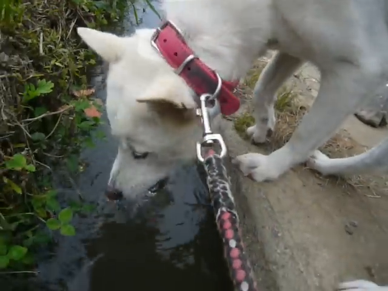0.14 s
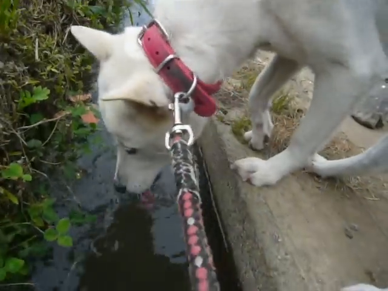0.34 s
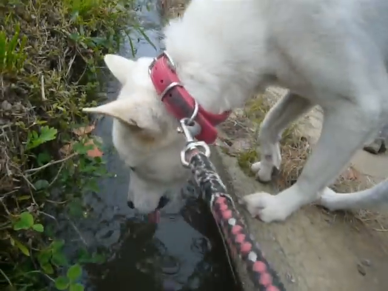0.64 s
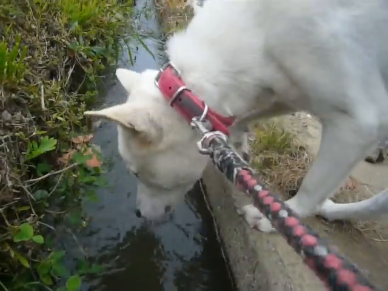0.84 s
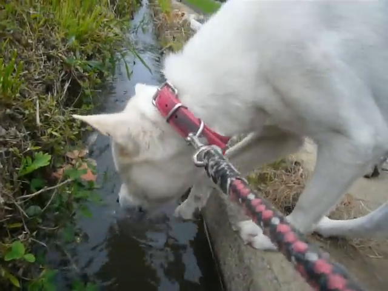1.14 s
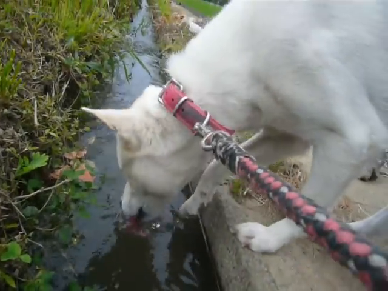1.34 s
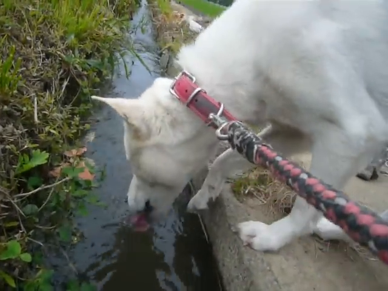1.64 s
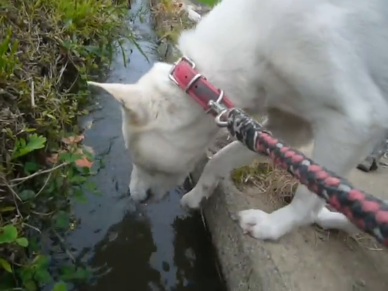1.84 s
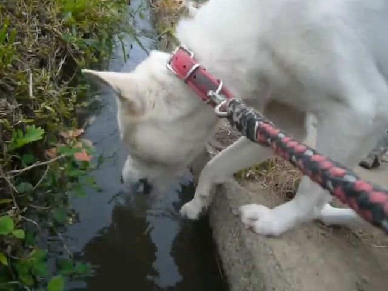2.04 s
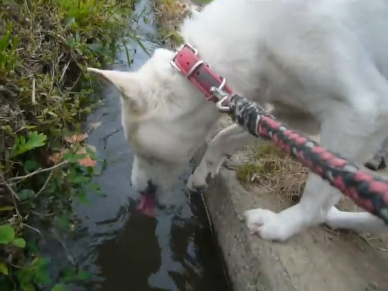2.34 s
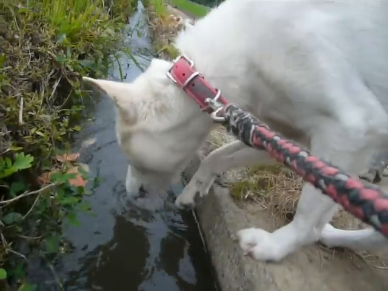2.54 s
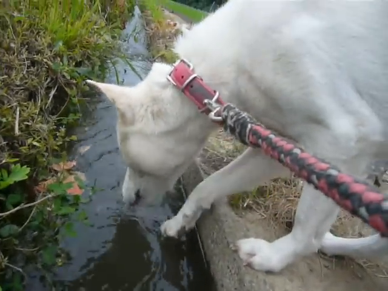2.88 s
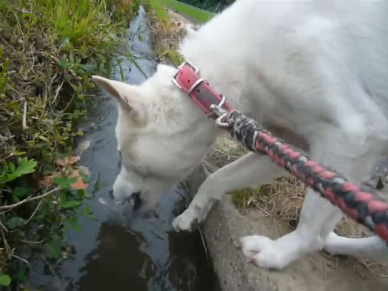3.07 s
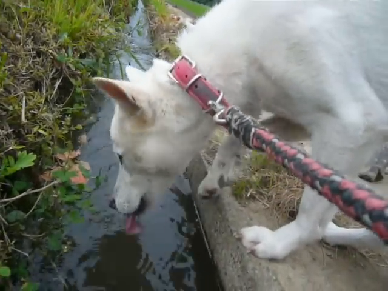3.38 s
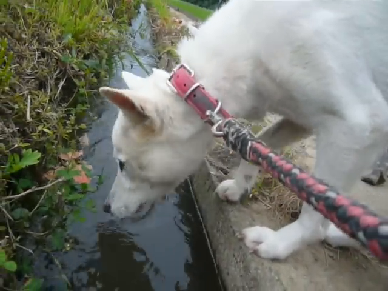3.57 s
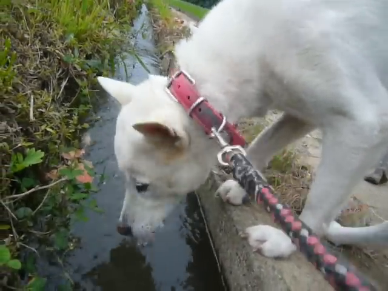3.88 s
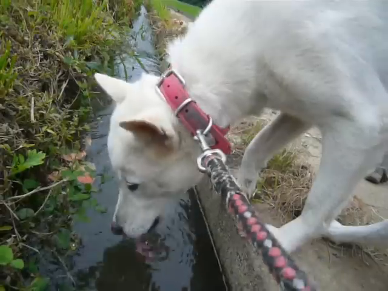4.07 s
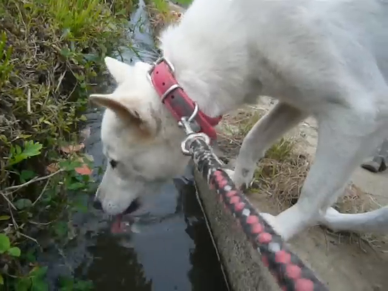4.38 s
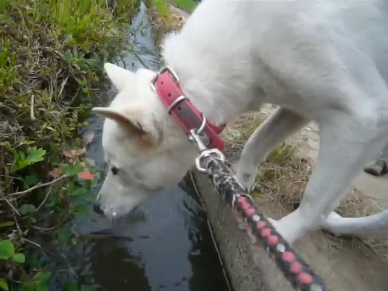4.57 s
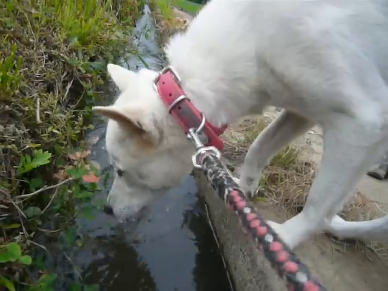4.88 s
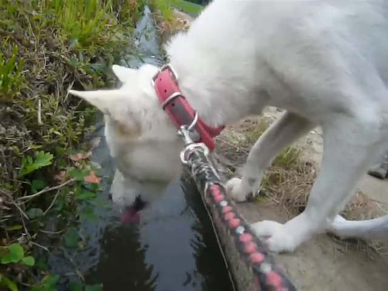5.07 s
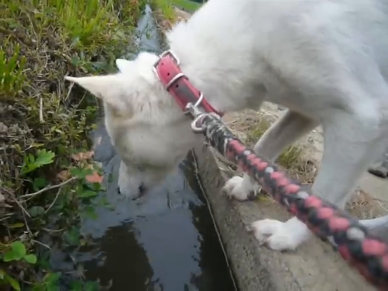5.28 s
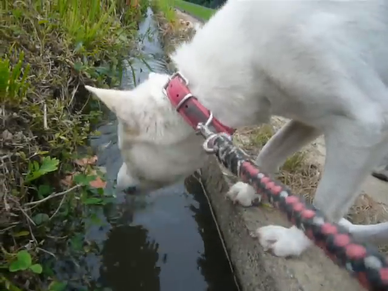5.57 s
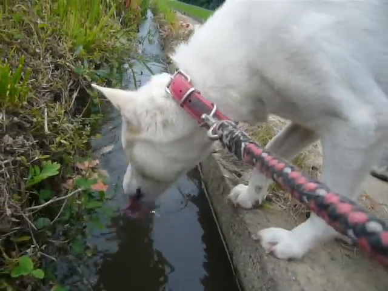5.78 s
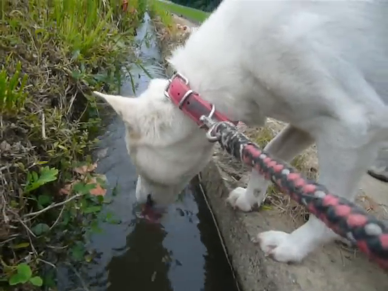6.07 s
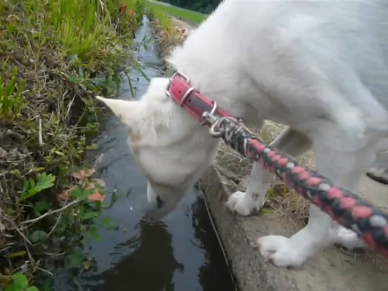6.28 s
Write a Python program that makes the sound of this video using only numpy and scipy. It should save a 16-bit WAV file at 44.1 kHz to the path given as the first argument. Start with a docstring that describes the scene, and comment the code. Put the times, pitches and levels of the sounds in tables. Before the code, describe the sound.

A dog laps water fast from a narrow ditch, each stroke a wet slosh with clicks, plips and small gulps.

```python
"""A dog's tongue laps quickly from a narrow concrete ditch, about three strokes a second. Each stroke sloshes
the surface, then water falls back in spray and drops: swarms and single ringing air pockets. Now and then the
tongue smacks, a click and a ring, or gulps a big pocket that sheds smaller ones. The ditch runs underneath as
coloured noise and sparse bubbles, and a thin tone slides down once. A hand-held camera adds hum, whine, hiss,
knocks and grip rumble; its digital filter ends the sound near 4 kHz."""
import sys
import numpy as np
from scipy import signal
from scipy.fft import rfft, irfft, next_fast_len
from scipy.io import wavfile
from scipy.ndimage import uniform_filter1d

SR = 44100
rng = np.random.default_rng(int(sys.argv[2]) if len(sys.argv) > 2 else 0)


def inscribe(sig):
    """Save sig as 16-bit PCM at rate SR to the path in sys.argv[1].

    A 1-D sig is mono; a 2-D sig holds one channel per row.
    Samples are clipped to [-1, 1] before scaling.
    """
    pcm = np.round(np.clip(np.atleast_2d(sig).T, -1, 1) * 32767)
    wavfile.write(sys.argv[1], SR, pcm.astype(np.int16))


N = 283122


def from_db(db):
    """Decibels to gain."""
    return 10 ** (np.asarray(db) / 20)


def rms_one(x):
    """Scale to rms 1."""
    return x / np.sqrt(np.mean(x ** 2) + 1e-20)


def at_hz(points, hz):
    """Read a spectrum in dB on a log-frequency axis."""
    point_hz, point_db = np.transpose(points)
    return np.interp(np.log(hz + 1e-9), np.log(point_hz), point_db)


def coloured(gain_at):
    """Noise of rms 1 whose gain follows a function of frequency."""
    size = next_fast_len(N)
    spectrum = rfft(rng.standard_normal(size))
    gain = gain_at(np.fft.rfftfreq(size, 1 / SR))
    return rms_one(irfft(spectrum * gain, size)[:N])


def add(out, s, sound):
    """Mix a short sound in at time s."""
    start = int(np.clip(round(s * SR), 0, N - 1))
    out[start:start + len(sound)] += sound[:N - start]


def swells(rows):
    """Gain that builds up to each (s, dB, rise s, fall s) and dies away after it, adding overlaps as power."""
    t = np.arange(0, N, 32) / SR
    power = np.zeros(len(t))
    for s, db, rise, fall in rows:
        distance = np.maximum((s - t) / rise, (t - s) / fall)
        power += from_db(db) ** 2 * np.exp(-2 * distance)
    return np.interp(np.arange(N) / SR, t, np.sqrt(power))


def bubble(hz, t60, rise, swell_cycles, collapse=1.47):
    """An air pocket swells and rings, its pitch climbing; a collapse above 1 makes it die ever faster."""
    t = np.arange(int(t60 * SR) + 8) / SR
    swell = 1 - np.exp(-t * hz / swell_cycles)
    envelope = swell * np.exp(-np.log(1000) * (t / t60) ** collapse)
    pitch = hz * (1 + rise * (t / t60 - 1 / 5))
    return envelope / envelope.max() * np.sin(2 * np.pi * np.cumsum(pitch) / SR)


def pocket(hz, t60, rise=0.043, collapse=1.48, swell_cycles=0.77):
    """A pocket rings, and the water closing over it makes a tiny splash; low pockets splash longer."""
    splash_db, splash_swell_s = -14, 0.0038
    splash_t60 = 0.031 * np.sqrt(1000 / hz)
    t = np.arange(SR // 5) / SR
    edges_hz = [min(hz * 1.1, SR / 16), min(hz * 3, SR / 8)]
    band = signal.butter(1, edges_hz, "band", fs=SR, output="sos")
    splash = rms_one(signal.sosfilt(band, rng.standard_normal(len(t))))
    envelope = (1 - np.exp(-t / splash_swell_s)) * np.exp(-np.log(1000) * t / splash_t60)
    out = from_db(splash_db) * splash * envelope
    ring = bubble(hz, t60, rise, swell_cycles, collapse)[:len(t)]
    out[:len(ring)] += ring
    return out


def spatter(hz, length, count=9):
    """Tiny pockets of scattered pitch burst in quick succession; rms 1 over the length in s."""
    octaves, ring_cycles, spread_db = 0.47, 10.3, 4   # octaves and dB reach either way
    out = np.zeros(SR // 10)
    for k, (slip, pitch, strength) in enumerate(rng.random((count, 3))):
        own_hz = hz * 2 ** (octaves * (2 * pitch - 1))
        ring = bubble(own_hz, ring_cycles / own_hz, rise=0.13, swell_cycles=1.0)
        start = int((k + slip) / count * length * SR)
        gain = from_db(spread_db * (2 * strength - 1))
        out[start:start + len(ring)] += gain * ring[:len(out) - start]
    return out * np.sqrt(length * SR / np.sum(out ** 2))


def swarm(colour, per_s, cycles, spread_db, rise, even_s, count=48):
    """Small bubbles of random size and pitch, their slow level swings evened out; rms 1."""
    pitches = np.geomspace(colour[0][0], colour[-1][0], count)
    dampings = rng.uniform(-.9, 1, count)   # octaves of ring length
    rings = []
    for hz, damping in zip(pitches, dampings):
        ring = bubble(hz, cycles * 2 ** damping / hz, rise, swell_cycles=0.16)
        rings.append(from_db(at_hz(colour, hz)) * np.sqrt(hz) * ring)
    when, which, rarity = rng.random((int(per_s * N / SR), 3)).T
    # most are small, a few stand out
    strengths = from_db(-spread_db * np.log(np.maximum(rarity, .03)))
    out = np.zeros(N + SR)
    for start, k, strength in zip((when * N).astype(int), (which * count).astype(int), strengths):
        out[start:start + len(rings[k])] += strength * rings[k]
    out = rms_one(out[:N])
    size = max(int(even_s * SR), 2)
    power = uniform_filter1d(uniform_filter1d(out ** 2, size), size)
    return rms_one(out / np.sqrt(np.abs(power) + 0.035))


def stirred_water():
    """Every stroke sloshes the surface and throws fine spray; the water falling back does so again."""
    # strokes of the tongue: start_s, slosh_db, spray_db, build_and_settle_s,
    # wait_s until the water falls back, back_slosh_db, back_spray_db
    laps = [(0.0, -27, -37, 0.016, 0.16, -51, -42), (0.335, -37.5, -48, 0.18, 0.13, -40, -38),
            (0.53, -34, -42.5, 0.047, 0.14, -34.5, -39), (0.869, -44, -47, 0.067, 0.13, -31.5, -46),
            (1.24, -37, -58, 0.058, 0.069, -34, -48), (1.541, -25.5, -36, 0.012, 0.096, -37, -42),
            (1.833, -29, -42, 0.039, 0.096, -39, -46), (2.116, -34.5, -43.5, 0.058, 0.19, -35, -48),
            (2.53, -33.5, -47, 0.043, 0.12, -35, -40.5), (2.86, -39, -45, 0.15, 0.13, -35, -39),
            (3.18, -31, -44, 0.035, 0.28, -50, -47), (3.595, -32.5, -46, 0.051, 0.1, -36.5, -40),
            (3.90, -33.5, -45, 0.023, 0.17, -36, -44), (4.301, -33.5, -44, 0.033, 0.098, -36, -35.5),
            (4.62, -32, -39.5, 0.025, 0.089, -32, -39), (4.909, -34.5, -51, 0.027, 0.14, -59, -46),
            (5.241, -33, -45, 0.05, 0.2, -36, -38), (5.745, -33.5, -58, 0.05, .04, -55, -62),
            (5.945, -36.5, -40, 0.044, 0.1, -34, -43), (6.269, -32.5, -40, 0.039, 0.1, -29, -34)]
    # colours of the two bubble swarms: pitch_hz, level_db
    slosh_colour = [(300, -3), (430, -3), (600, 2.5), (760, -4), (1050, 5), (1400, -6.5)]
    spray_colour = [(1450, 9.5), (1700, 4), (2100, -0.5), (2700, 3.5), (3300, -1), (3900, -1.5)]
    back_rise_s, back_fall_s = 0.019, 0.022
    ripple_slosh_db, ripple_spray_db = -45, -50.5   # the surface between strokes
    s, slosh_db, spray_db, length, wait, back_slosh_db, back_spray_db = np.transpose(laps)

    def level(stroke_db, back_db, ripple_db):
        """Stroke, fall-back and resting ripple add as power."""
        stroke = swells(zip(s, stroke_db, length, length))
        back = swells((when, db, back_rise_s, back_fall_s) for when, db in zip(s + wait, back_db))
        return np.sqrt(stroke ** 2 + back ** 2 + from_db(ripple_db) ** 2)

    slosh = swarm(slosh_colour, per_s=600, cycles=18.0, spread_db=2.5, rise=0.17, even_s=0.081)
    spray = swarm(spray_colour, per_s=950, cycles=30, spread_db=4.0, rise=0.097, even_s=0.069)
    sloshing = level(slosh_db, back_slosh_db, ripple_slosh_db) * slosh
    spraying = level(spray_db, back_spray_db, ripple_spray_db) * spray
    return sloshing + spraying


def gulping():
    """The tongue traps a big air pocket that rings, closes with a splat and sheds smaller pockets."""
    # big pockets: start_s, pitch_hz, level_db, small_pockets_db against the big one, t60_s
    gulps = [(0.87, 350, -13, -11.5, 0.042), (1.8562, 349, -25, -11, .044), (2.1451, 356, -13, -6, 0.037),
             (3.2592, 321, -29.5, -18, .055), (3.9335, 303, -28, -8.5, 0.061),
             (5.242, 345, -14.5, -10, 0.042)]
    # a short low push and two ringing tones: pitch_ratio, level_db, share of the big pocket's t60
    gulp_rings = [(0.74, -19.5, 0.41), (1.02, 1, 0.91), (1.56, -5, 0.38)]
    # the small pockets it sheds: delay_s, pitch_hz, level_db, t60_s
    sheds = [(.001, 780, 2, 0.0033), (.006, 1080, -1, 0.0093), (.0065, 2000, -21, .003),
             (0.0097, 1516, -2.5, 0.023)]
    splat_delay_s, splat_hz, splat_db, splat_length_s = 0.00319, 758, -7.5, .013
    scatter_share, scatter_s = 0.053, 0.00079   # no two gulps shed alike in pitch and timing
    out = np.zeros(N)
    for s, hz, big_db, small_pockets_db, big_t60 in gulps:
        for ratio, ring_db, share in gulp_rings:
            # climbs further in pitch and is cut short as it bursts
            ring = pocket(hz * ratio, big_t60 * share, rise=0.067, collapse=1.74, swell_cycles=1)
            add(out, s, from_db(big_db + ring_db) * ring)
        shed_db = big_db + small_pockets_db
        add(out, s + splat_delay_s, from_db(shed_db + splat_db) * spatter(splat_hz, splat_length_s))
        for delay, small_hz, small_db, t60 in sheds:
            late, sharp = rng.uniform(-1.02, 1, 2)
            small = pocket(small_hz * (1 + scatter_share * sharp), t60)
            add(out, s + delay + scatter_s * late, from_db(shed_db + small_db) * small)
    return out


def smacking():
    """The wet tongue smacks: a short click, answered at once by a ringing pocket."""
    # start_s, click_hz, click_db, ring_hz, ring_db, ring t60_s, collapse (1 fades freely, 4 is cut off)
    smacks = [(0.071, 1690, -21.5, 1110, -23, 0.028, 1), (0.3174, 1750, -18.5, 1140, -27, 0.04, 1.4),
              (0.495, 488, -9, 1072, -8.5, 0.018, 1.8), (1.538, 890, -27, 2060, -20, 0.015, 1),
              (2.3495, 1880, -20.5, 3680, -10.5, 0.0028, 1.2), (3.9075, 2380, -16, 1690, -18, 0.016, 1.5),
              (4.406, 570, -19.5, 1150, -20.5, 0.032, 1.1), (4.622, 710, -16.5, 2200, -21, .005, 1),
              (4.699, 1850, -10, 2594, -10, 0.0067, 3.5), (5.3188, 2830, -11, 1665, -15, 0.015, 1.2),
              (5.7459, 2480, -18.5, 840, -15.5, 0.017, 0.93),
              (5.971, 770, -15.5, 1830, -17.5, 0.0078, 0.87), (6.047, 2540, -24, 1710, -23, 0.006, 1.15),
              (6.3688, 2240, -31, 1540, -11, 0.0058, 4.6)]
    ring_lag_s = 0.00059
    out = np.zeros(N)
    for s, click_hz, click_db, ring_hz, ring_db, t60, collapse in smacks:
        click_t60 = 0.0031 * np.sqrt(2000 / click_hz)   # low clicks last longer
        add(out, s, from_db(click_db) * bubble(click_hz, click_t60, rise=0.11, swell_cycles=1.0))
        add(out, s + ring_lag_s, from_db(ring_db) * pocket(ring_hz, t60, collapse=collapse))
    return out


def drops():
    """Drops from the muzzle trap one small pocket each; water from tongue and lips spatters in bursts."""
    # single drops: start_s, pitch_hz, level_db, t60_s
    plips = [(0.212, 1080, -23.5, 0.042), (0.3248, 845, -20, 0.005), (0.438, 3050, -27, .008),
             (0.512, 910, -19.5, 0.021), (0.5308, 3400, -27, 0.013), (0.541, 1080, -36, 0.015),
             (0.578, 3650, -24, 0.0042), (0.8497, 1100, -24, 0.007), (1.061, 3280, -36.5, .015),
             (1.131, 2650, -22.5, 0.0095), (1.1415, 2900, -21.5, 0.0028), (1.2864, 597, -22.5, 0.02),
             (1.302, 554, -27, 0.021), (1.3225, 3070, -28, .008), (1.3687, 1710, -28, 0.02),
             (1.3911, 1110, -26.5, .01), (1.392, 2580, -30, .007), (1.3924, 1630, -22.5, 0.01),
             (1.411, 2580, -22, 0.0069), (1.5405, 1030, -18, 0.005), (1.6116, 610, -23.5, 0.021),
             (1.622, 2420, -34, .007), (1.633, 1680, -30, 0.007), (1.639, 1140, -23.5, 0.017),
             (1.8625, 634, -24, 0.0099), (1.9503, 3050, -33, 0.016), (2.0335, 3360, -35, .011),
             (2.085, 510, -28, 0.043), (2.1282, 1040, -23, 0.011), (2.248, 3220, -32, 0.026),
             (2.287, 3300, -33, 0.0064), (2.351, 2930, -22, 0.007), (2.3526, 2350, -24, 0.013),
             (2.353, 1170, -24, 0.01), (2.5, 1550, -24, 0.0078), (2.5915, 3400, -36, .011),
             (2.631, 1650, -27, 0.0083), (2.709, 694, -28, 0.024), (2.8127, 448, -28.5, 0.054),
             (2.8442, 1065, -28, 0.043), (2.8677, 1150, -18, 0.0072), (2.9481, 464, -26, 0.012),
             (2.959, 2450, -28.5, 0.016), (2.988, 1600, -26.5, .011), (3.035, 1650, -20.5, 0.0084),
             (3.0516, 2480, -32, 0.029), (3.063, 1610, -21.5, 0.023), (3.1385, 3140, -35, 0.0099),
             (3.151, 1630, -27.5, 0.019), (3.165, 926, -19.5, 0.02), (3.206, 373, -30, 0.068),
             (3.5748, 2450, -29.5, .009), (3.6946, 2400, -30, .007), (3.717, 2590, -24.5, 0.0052),
             (3.7186, 3930, -25, 0.0066), (3.8096, 433, -32.5, 0.11), (3.8273, 2540, -30, .01),
             (3.8512, 3020, -23.5, 0.0032), (3.8883, 1070, -20, 0.013), (3.889, 1510, -32, .009),
             (3.91, 875, -17.5, 0.0056), (3.9115, 2450, -25, .005), (4.0838, 977, -20.5, 0.027),
             (4.0924, 1095, -18.5, 0.023), (4.365, 550, -25, 0.03), (4.3878, 2300, -26, .009),
             (4.404, 3900, -29, .007), (4.4105, 2560, -21, 0.0063), (4.523, 2730, -32.5, .018),
             (4.612, 1160, -18, 0.017), (4.6645, 2800, -28, .009), (4.681, 984, -24.5, 0.024),
             (4.6952, 477, -23, 0.016), (4.6995, 855, -19.5, .007), (5.011, 1540, -27.5, .013),
             (5.0304, 2640, -18.5, 0.0017), (5.078, 3190, -30.5, 0.009), (5.1067, 588, -28, 0.061),
             (5.1526, 571, -29, 0.093), (5.3964, 2800, -30, .008), (5.4, 1060, -24, 0.0094),
             (5.443, 2950, -30, .007), (5.4437, 1670, -23, 0.0093), (5.4703, 4000, -33, .01),
             (5.54, 3014, -33.5, .01), (5.6572, 2580, -36, .023), (5.662, 1390, -13.5, 0.0017),
             (5.689, 2770, -19, 0.0027), (5.6898, 1640, -25, 0.012), (5.7403, 1580, -27, 0.011),
             (5.768, 3150, -23.5, 0.0064), (5.7871, 586, -27, 0.074), (5.9637, 1100, -18, 0.0086),
             (6.2312, 1160, -24, 0.012), (6.243, 1780, -29, 0.012), (6.27, 510, -26, 0.019),
             (6.3213, 2560, -28.5, .009), (6.347, 600, -22, 0.016), (6.387, 3190, -26, .007),
             (6.387, 1360, -17.5, 0.0084)]
    # bursts of tiny pockets: start_s, middle_pitch_hz, rms_db, length_s
    spatters = [(0.069, 1490, -29.5, 0.0097), (0.143, 2230, -32.5, 0.013), (0.237, 1690, -35, 0.0077),
                (0.31, 1870, -39, 0.018), (0.35, 1200, -35.5, .008), (0.436, 2700, -44, 0.0096),
                (0.642, 2940, -41, 0.014), (0.671, 1450, -42, 0.0098), (1.128, 2780, -43, 0.0086),
                (1.239, 1230, -39, 0.0071), (1.318, 2660, -33.5, 0.013), (1.326, 1860, -37, 0.017),
                (1.388, 2100, -38, 0.009), (1.507, 1820, -32.5, 0.0084), (1.534, 2400, -34.5, 0.011),
                (1.61, 1900, -34, 0.015), (1.63, 3400, -39, .004), (1.652, 3400, -36, 0.0052),
                (1.677, 1170, -30.5, 0.0059), (1.707, 2260, -38, 0.013), (1.827, 1430, -36.5, 0.014),
                (1.922, 2580, -42.5, 0.0062), (2.285, 2770, -31, 0.0051), (2.3515, 2770, -32, 0.0061),
                (2.627, 2300, -32, 0.0096), (2.65, 1400, -35, 0.011), (2.836, 1240, -33, 0.011),
                (2.867, 1600, -42, 0.013), (2.946, 1100, -36.5, 0.0086), (2.984, 1900, -38, 0.017),
                (3.028, 2270, -34.5, 0.012), (3.06, 2280, -43, .009), (3.074, 2440, -40, 0.013),
                (3.142, 2500, -40, .008), (3.185, 870, -32, 0.011), (3.214, 1500, -34, 0.0076),
                (3.506, 1310, -35, 0.0087), (3.573, 1716, -43, .008), (3.603, 2580, -39.5, 0.017),
                (3.906, 2740, -36, 0.0052), (4.082, 2730, -41, .012), (4.384, 2350, -37, 0.0078),
                (4.741, 1120, -35, 0.0073), (4.884, 1370, -38, 0.011), (5.027, 2430, -39, 0.0062),
                (5.055, 2820, -43.5, 0.017), (5.224, 1410, -35, 0.011), (5.242, 2110, -35, .011),
                (5.388, 1050, -32.5, 0.0056), (5.648, 2030, -39.5, 0.013), (5.689, 1830, -34, 0.0038),
                (5.717, 1040, -35, 0.02), (5.739, 2350, -34.5, 0.0098), (5.765, 1900, -40, 0.0069),
                (6.039, 1300, -35, 0.0068), (6.077, 2920, -31.5, 0.006), (6.27, 1460, -33, 0.0059),
                (6.355, 2540, -32.5, 0.0092), (6.386, 2470, -30, .008)]
    out = np.zeros(N)
    for s, hz, level_db, t60 in plips:
        add(out, s, from_db(level_db) * pocket(hz, t60))
    for s, hz, rms_db, length in spatters:
        add(out, s, from_db(rms_db) * spatter(hz, length))
    return out


def ditch(x):
    """The close walls and the bank throw back a few quick echoes."""
    # reflections: delay_s, level_db
    walls = [(.0023, -23), (.0041, -33), (.0085, -31), (0.017, -44)]
    out = x.copy()
    for delay, level_db in walls:
        add(out, delay, from_db(level_db) * x)
    return out


def chirp():
    """A thin, faint tone slides down and fades."""
    # path of the tone: time_s, pitch_hz, peak_db
    glide = [(3.352, 2750, -56), (3.364, 2440, -41), (3.383, 2000, -44), (3.405, 1650, -55)]
    s, path_hz, path_db = np.transpose(glide)
    t = np.arange(N) / SR
    hz, peak_db = np.interp(t, s, path_hz), np.interp(t, s, path_db)
    sounding = (t > s[0]) & (t < s[-1])
    return sounding * from_db(peak_db) * np.sin(2 * np.pi * np.cumsum(hz) / SR)


def bumps(cycles):
    """The camera body takes soft, rounded knocks: a push and a pull that die at once."""
    # knocks: start_s, pitch_hz, level_db
    knocks = [(0.666, 260, -28), (0.7518, 164, -20.5), (0.7852, 120, -20.5), (0.798, 200, -37),
              (0.836, 260, -23), (0.847, 109, -26), (2.582, 149, -31), (2.6703, 148, -19.5)]
    out = np.zeros(N)
    for s, hz, level_db in knocks:
        knock = bubble(hz, cycles / hz, rise=0, swell_cycles=0.5, collapse=2.05)
        add(out, s, from_db(level_db) * knock)
    return out


def handling(top_hz):
    """The hand shifting its grip on the camera makes a dull rumble of low noise."""
    # grip shifts: centre_s, level_db
    grips = [(0.675, -39.5), (0.715, -43), (0.76, -43), (0.81, -40), (2.60, -49), (2.668, -45)]
    rise_s, fall_s = 0.011, 0.057
    level = swells((s, db, rise_s, fall_s) for s, db in grips)
    return level * coloured(lambda f: f / (f + top_hz / 10) / (1 + (f / top_hz) ** 4))


def running_water():
    """The ditch murmurs as coloured noise, and sparse, clear bubbles chirp upward in it."""
    # spectrum of the murmur: frequency_hz, level_db (per Hz)
    flow = [(35, -2), (60, 2.5), (90, 4.5), (150, 2.5), (260, 1.5), (520, -23), (720, -5.5), (1000, -1.5),
            (1800, -6.5), (3200, -7), (4400, -12)]
    # colour of the trickling bubbles: pitch_hz, level_db
    trickle = [(450, 2), (950, 3.5), (1600, -6), (2600, -2), (3600, -7)]
    murmur = coloured(lambda f: from_db(at_hz(flow, f)))
    bubbles = swarm(trickle, per_s=130, cycles=24.3, spread_db=2, rise=0.28, even_s=0.1)
    return from_db(-44.0) * murmur + from_db(-45.5) * bubbles


def camera_noise():
    """Steady hum tones, a thin whine and the converter's coloured hiss."""
    # hum tones: frequency_hz, rms_db
    hum = [(52, -56), (143, -54)]
    # spectrum of the hiss: frequency_hz, level_db (per Hz)
    hiss = [(1000, 0), (4500, 0.5), (7000, -0.5), (11000, -1.5), (14500, -3), (16000, -11)]
    whine = (8000, -71)   # Hz, rms dB
    t = np.arange(N) / SR
    out = from_db(-52.0) * coloured(lambda f: from_db(at_hz(hiss, f)))
    for hz, rms_db in [*hum, whine]:
        out += from_db(rms_db) * np.sqrt(2) * np.sin(2 * np.pi * hz * t)
    return out


def microphone(x, ceiling):
    """Loud peaks round off, the offset signal sticks in a dead band above zero, and a filter dulls it."""
    top_hz = 4065
    offset, dead_band = .0233, .016   # shares of full scale
    rounded = x / (1 + (x / ceiling) ** 4) ** (1 / 4) - offset
    stuck = rounded - np.clip(rounded, 0, dead_band)
    taps = signal.firwin(101, top_hz, fs=SR)
    return signal.fftconvolve(stuck, taps, "same")


def scene():
    """Lapping over the flowing ditch, heard through the hand-held camera."""
    water = ditch(stirred_water() + gulping() + smacking() + drops())
    touch = bumps(cycles=1.7) + handling(top_hz=170)
    heard = microphone(water + running_water() + chirp() + touch, ceiling=0.47)
    return (heard + camera_noise())[None]


def record(dry):
    """A steep low-pass cuts the top at 15.7 kHz."""
    cut = signal.ellip(10, .1, 80, 15700, fs=SR, output="sos")
    return signal.sosfilt(cut, dry)


dry = scene()
out = record(dry)
inscribe(out)
```